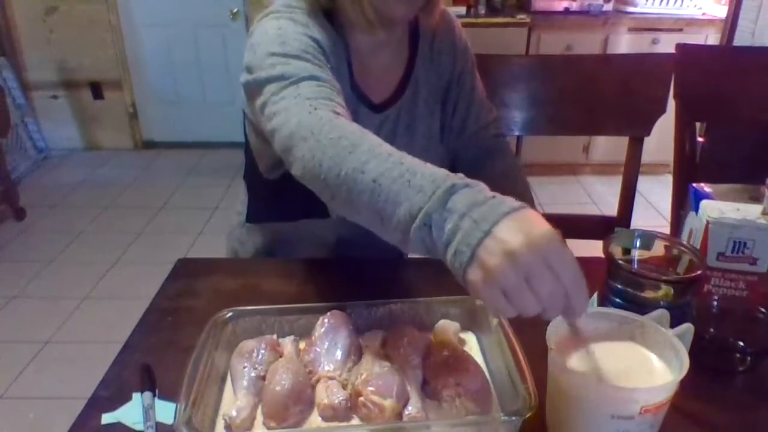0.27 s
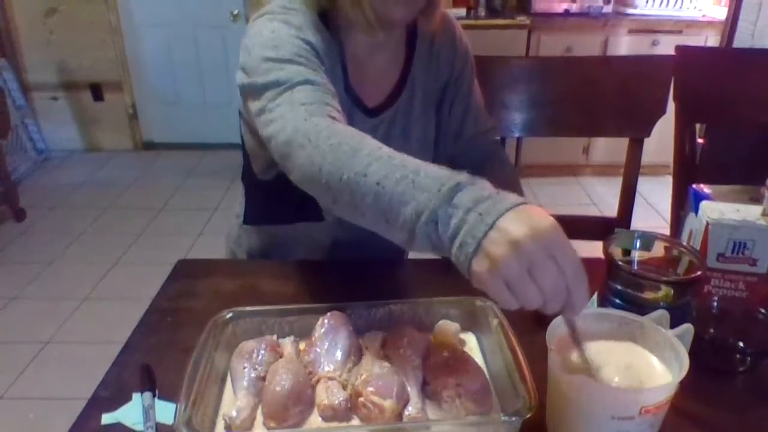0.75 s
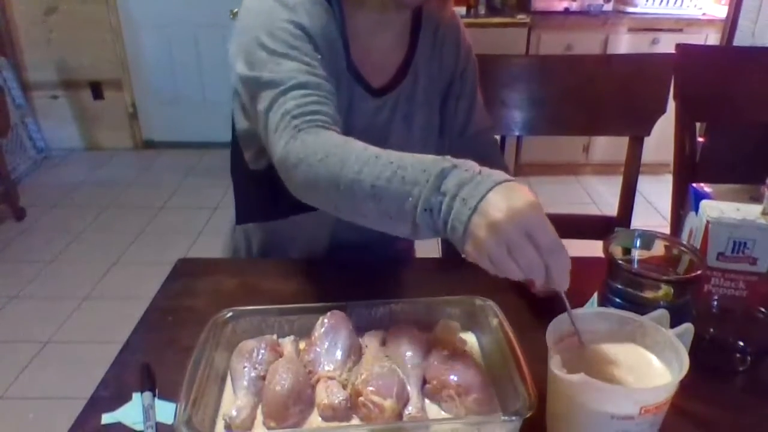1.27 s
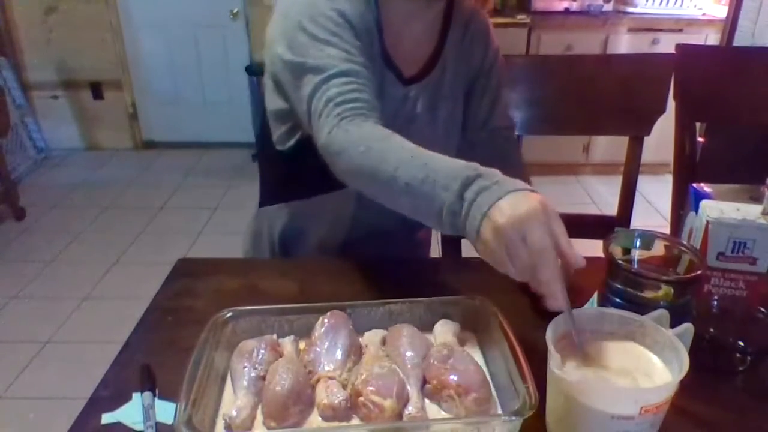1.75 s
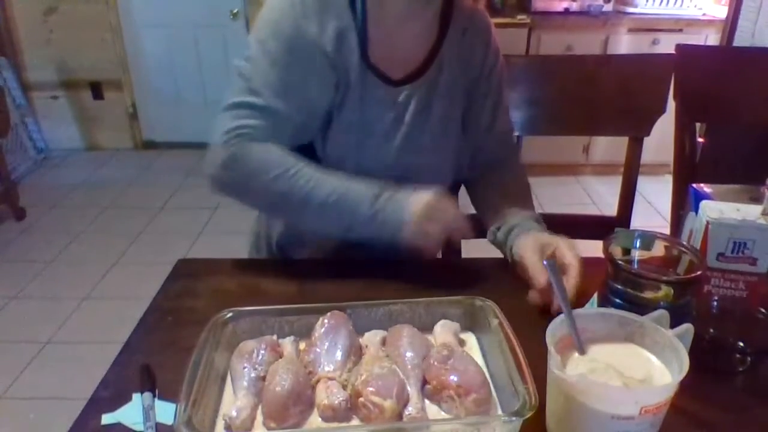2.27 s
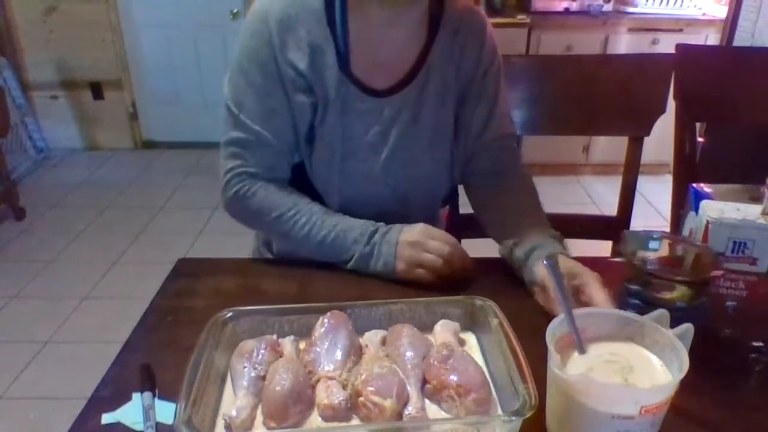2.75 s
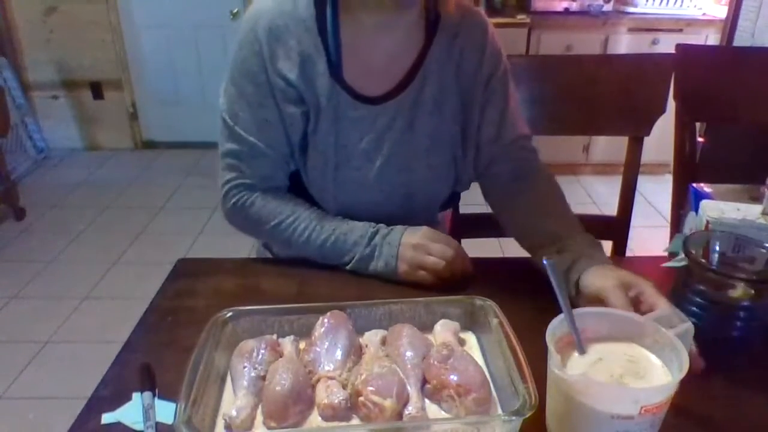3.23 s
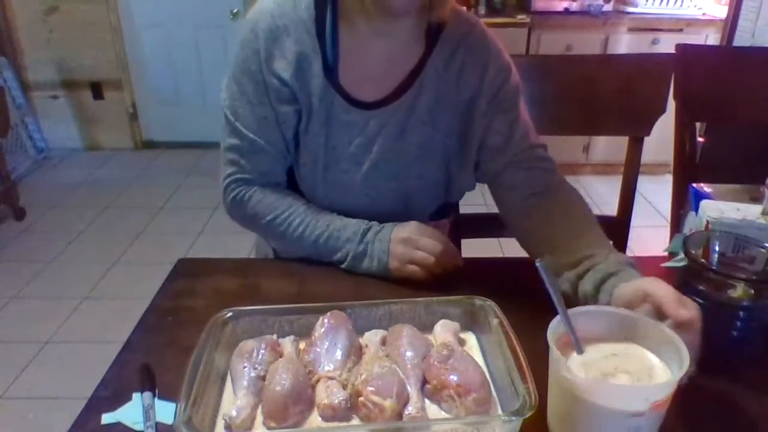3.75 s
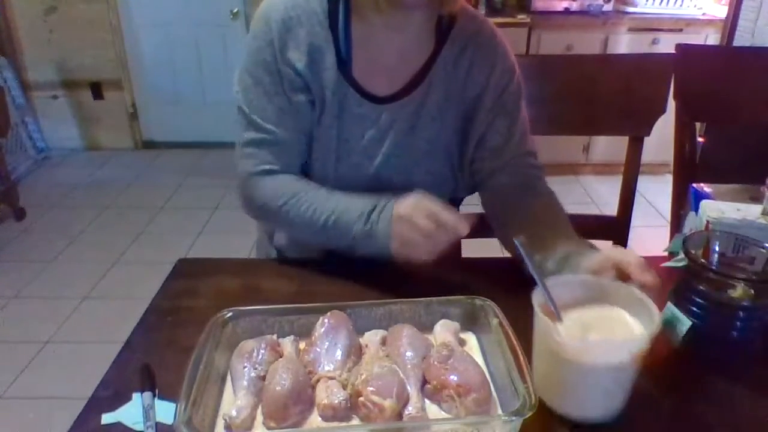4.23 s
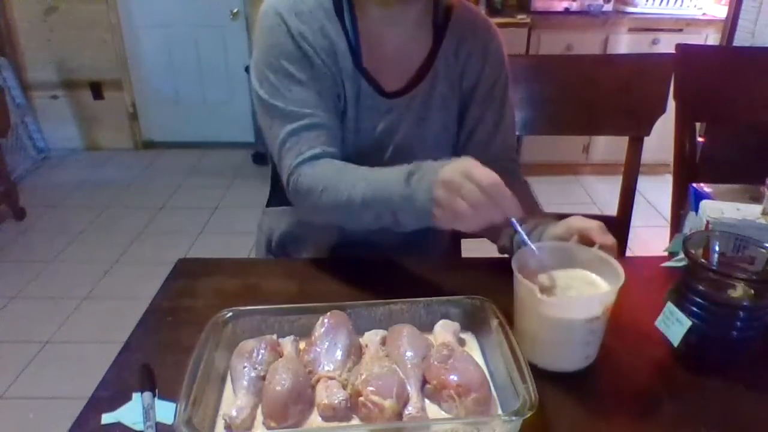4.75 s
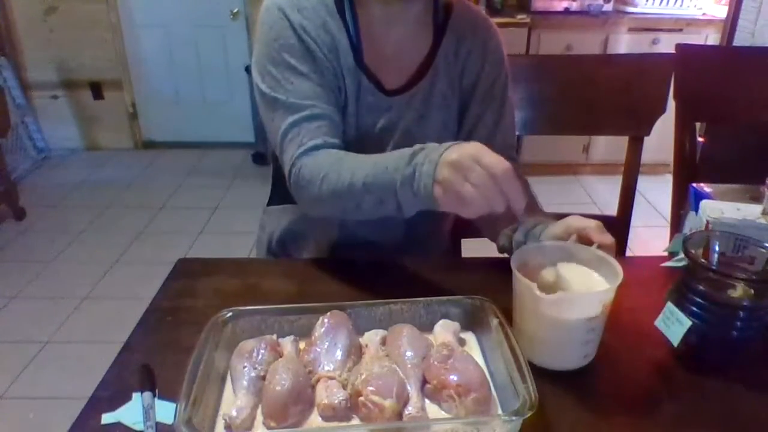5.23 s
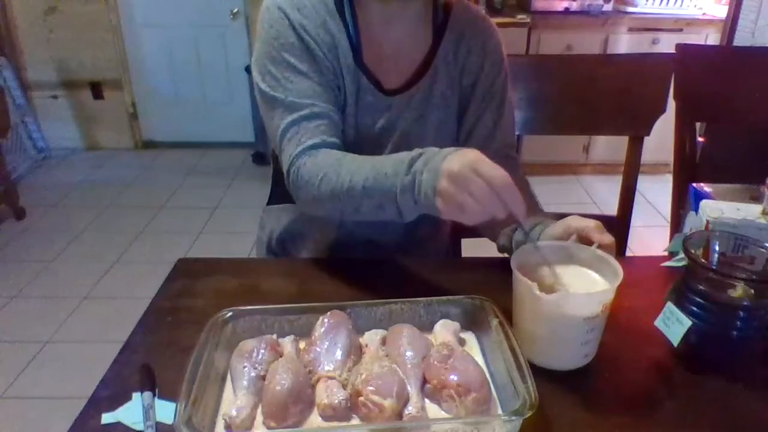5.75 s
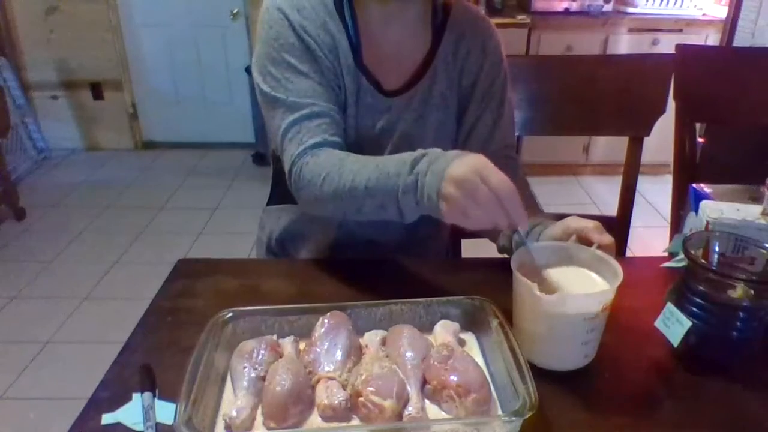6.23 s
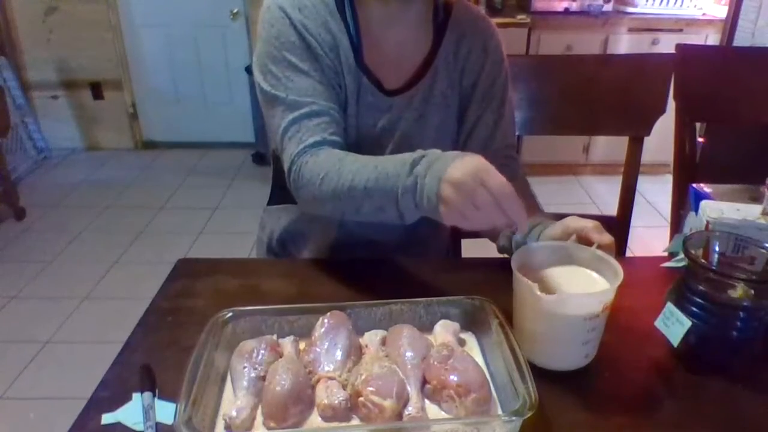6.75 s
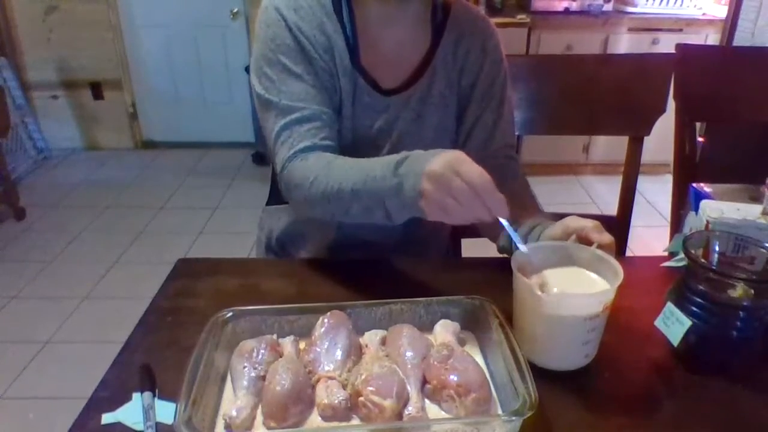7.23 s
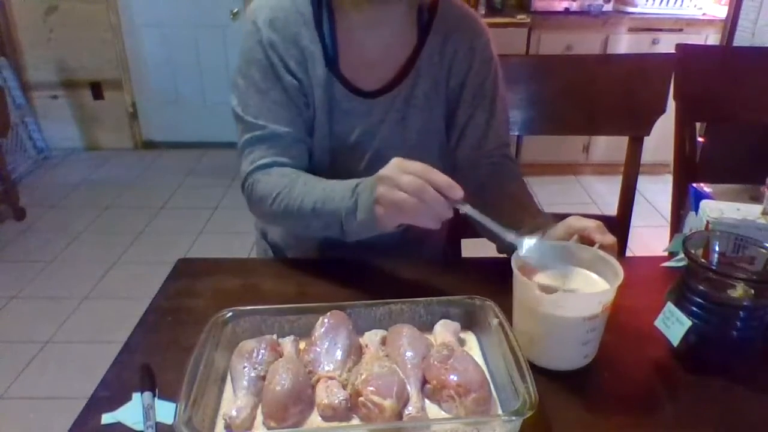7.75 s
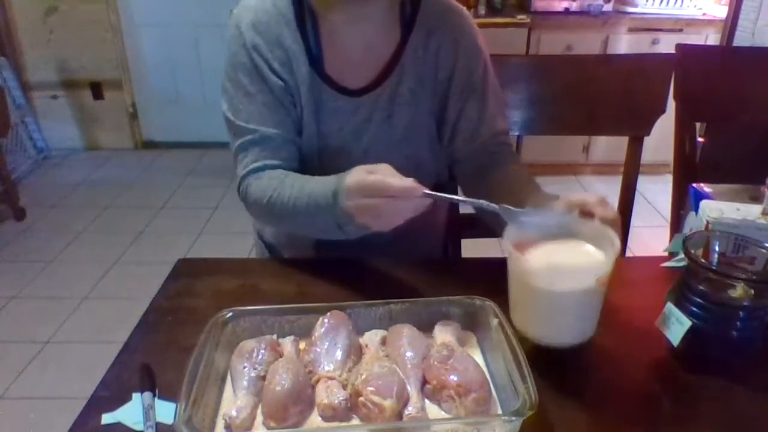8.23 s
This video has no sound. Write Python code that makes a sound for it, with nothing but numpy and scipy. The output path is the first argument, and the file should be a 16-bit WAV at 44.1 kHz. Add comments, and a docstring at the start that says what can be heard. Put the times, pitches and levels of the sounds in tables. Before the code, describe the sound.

A steel spoon knocks in a plastic jug of creamy marinade, pauses for bumps and sliding on a wooden table, then beats fast and gritty.

```python
"""First a few knocks of a steel spoon in a plastic jug of creamy marinade on a wooden kitchen table.
The spoon is left leaning, a glass jar is pushed aside and the jug drawn closer: dull bumps, gritty friction.
Then fast beating: forward strokes knock or skid along the wall, return strokes tap it.
Blows ring damped modes of table, jug and spoon; marinade, slides and sleeves are shaped random grains.
All is straight ahead of the microphone, over still kitchen air, a very faint noise and a thin pulsing whine."""
import sys
import numpy as np
from scipy import signal
from scipy.fft import rfft, irfft, next_fast_len
from scipy.io import wavfile
from scipy.ndimage import uniform_filter1d, map_coordinates

SR = 44100
rng = np.random.default_rng(int(sys.argv[2]) if len(sys.argv) > 2 else 0)


def wav_out(sig):
    """Save sig, one row per channel (or a flat mono array), as 16-bit PCM at SR to the path in sys.argv[1]."""
    wavfile.write(sys.argv[1], SR, np.round(np.clip(np.atleast_2d(sig).T, -1, 1) * 32767).astype(np.int16))


N = 374407  # samples

# Spoon skids along the jug wall; thump (base and table), wall and rim are relative to the clack:
# (t/s, strength/dB, thump/dB, wall/dB, rim/dB, brightness/dB per octave, slip decay/s)
SPOON_SKIDS = [(0.625, -67.5, -12, 3, -1.5, -1, 0.01), (1.344, -64.5, -5, -9, -1.5, -6, 0.039),
               (1.493, -74, 9, 14.5, 7.5, -14, 0.16), (1.696, -58.5, 6.5, -2.5, -6, -0.5, 0.01),
               (1.745, -76, 18, 13, 7, -7, 0.058), (4.688, -63.5, -5, 1.5, 1, -5, 0.014),
               (4.736, -66, -0.5, -18, 1.5, -2, 0.016), (5.368, -54, -21, -19, -9, 5, 0.015),
               (5.4697, -44, -0.5, -2, -1, 3.5, 0.0024), (5.512, -50.5, -9, -5.5, -2, 0.5, 0.081),
               (5.661, -44, -0.5, -1, -5, 0, 0.0056), (5.752, -59, -12.5, -9, 1.5, 2, .018),
               (6.369, -49, 3.5, 5, -1, 2, 0.007), (6.533, -44.5, -0.5, 1, -3, 1.5, 0.01),
               (6.7047, -46.5, 2.5, 1.5, -1.5, 1, 0.012), (6.783, -76, 12, 16, -2, -3, .008),
               (6.882, -50, -3, -3, -2, 2, 0.0089)]
# Light taps, mostly on the return stroke, and rebounds:
# (t/s, strength/dB, thump/dB, wall/dB, rim/dB, brightness/dB per octave)
SPOON_TAPS = [(0.1136, -60.5, 5, -2, 5.5, 2), (0.303, -67.5, -18, 5.5, -2, 0),
              (1.966, -76, -20, -21.5, -25, 14), (2.387, -64, -27, -13, -18, 11),
              (2.439, -69.5, -4.5, -25, -6, 8), (3.471, -75, -16, -28, -26, 12),
              (4.358, -65, -10, -6, -11, 4), (4.577, -56, -2.5, -13, 0.5, -8),
              (4.902, -44.5, -8, -6, -4, 0.5), (4.981, -60, 0, -15, 2, -0.5), (5.169, -56, -9.5, -8, 1, 6),
              (5.181, -62, 0.5, -7, -5, 5), (5.107, -55, -4, -12, -9, 7), (6.04, -56, -9, -14, -4, 0),
              (6.213, -57, -15, -7, 1, -4), (6.322, -67, -19, -14, -8, -4), (6.716, -53.5, -19, -6, -8, -4),
              (5.357, -54, -12.5, -5.5, 1, 3.5), (5.535, -79, 16, -26, 12, -4),
              (5.569, -57, -14, -29, 2, 1), (5.7346, -61, -18, -2, 2, -3), (5.833, -64, -19, -13, -1, 3),
              (5.943, -53, -1.5, -5.5, 3.5, 4), (6.1171, -52, 1, -14, 4, 2),
              (6.237, -61, -16, -12.0, -18, -15), (6.289, -48.5, -2.5, -10, 1.5, 1),
              (6.458, -49, -3, -10, -1.5, -1.5), (6.558, -57.5, 10.5, 4.5, 0, -11),
              (6.632, -50, -3, -13, 1.5, 0), (6.799, -52, -1, -7, 3, 4), (6.895, -55, 5.5, -9, -10, 5),
              (6.973, -51.5, -1, -10.5, -0.5, 1)]
# Nominal ringing modes of the table top, from there up to the jug's rim and the spoon: (f/Hz, level/dB, t60/s)
TABLE_MODES = [(92.6, -9.5, 0.4), (132.2, -1, 0.18), (173, -4.5, 0.08), (215, 1, 0.071), (281, 4, 0.055)]
# Modes of the jug's base: (f/Hz, level/dB, t60/s)
BASE_MODES = [(350, -4.5, 0.016), (386.3, -0.5, 0.07), (437.5, -6, 0.091), (495, 5.5, 0.05),
              (603, -6.5, 0.068), (773, -5.5, 0.036), (890, -1, 0.022)]
# Modes of the jug's wall: (f/Hz, level/dB, t60/s)
WALL_MODES = [(1123, -24, 0.0067), (1348, -0.5, 0.059), (1403, 2, 0.029), (1470, 7.5, 0.035),
              (1564, -13, 0.075), (1954, -13.5, 0.062), (2115, -10.5, 0.099)]
# Modes of the jug's rim: (f/Hz, level/dB, t60/s)
RIM_MODES = [(2600, -19, 0.12), (2636, 0.5, 0.031), (2816, 8.5, .017), (2910, 2, 0.016), (3068, 4, 0.019),
             (3210, -6.5, 0.046), (3550, -1, 0.014)]
# Modes of the steel spoon: (f/Hz, level/dB, t60/s)
STEEL_MODES = [(4490, -2.5, 0.009), (5300, 1.5, 0.006), (5600, -4, 0.008), (6220, -6, 0.007),
               (13300, -5.5, .008), (14470, -4.5, 0.008)]


def amp(db):
    """Decibels to gain."""
    return 10 ** (np.asarray(db) / 20)


def unit(x):
    """Scale to rms 1."""
    return x / np.sqrt(np.mean(x ** 2) + 1e-20)


def along(points, hz):
    """Read (Hz, value) points on a log axis."""
    f, v = np.transpose(points)
    return np.interp(np.log(hz + 1), np.log(f + 1), v)


def filtered(x, response):
    """x times a response of frequency."""
    size = next_fast_len(N + SR // 2)
    return irfft(rfft(x, size) * response(np.fft.rfftfreq(size, 1 / SR)), size)[..., :N]


def coloured(x, spectrum):
    """x shaped by a (Hz, dB) curve, at rms 1."""
    return unit(filtered(x, lambda hz: amp(along(spectrum, hz))))


def grains(count, rate, spread_db):
    """Random tiny impacts of uneven size, about rate a second, at rms 1."""
    sizes = rng.standard_normal(count) * amp(spread_db * np.clip(rng.standard_normal(count), -2, 2))
    return unit(sizes * (rng.random(count) < rate / SR))


def add(track, s, sound):
    """Mix a sound into the track at time s."""
    start = max(round(s * SR), 0)
    track[start:start + len(sound)] += sound[:max(N - start, 0)]


def in_kitchen(x, wet_db, wall_s=0.0092, wall_db=-13, build_s=0.0027):
    """A sound, one near reflection and the diffuse tail of the room, whose decay varies with frequency."""
    # Decay of the kitchen: (f/Hz, t60/s)
    decay = [(100, 1), (300, 0.15), (490, 0.33), (750, 0.47), (1500, 0.26), (5000, 0.43), (13000, 0.28)]
    # Strength of the kitchen's tail, before the wet level: (f/Hz, level/dB)
    echo = [(50, -4.5), (130, -6), (380, -7), (490, 2), (620, -12), (850, -4), (1400, -8.5), (3000, -7.5),
            (6000, -12), (9000, -10), (14000, -11)]
    reflections = grains(SR // 2, rate=3500, spread_db=3)
    hz, t, z = signal.stft(reflections, SR, nperseg=256)
    t60 = along(decay, hz)[:, None]
    level = amp(along(echo, hz)[:, None] - 60 * t / t60)
    # equal energy whatever the decay time
    gain = level * np.sqrt(2 * np.log(1000) / (t60 * SR))
    tail = signal.istft(z * gain, SR, nperseg=256)[1]
    build_up = 1 - np.exp(-np.arange(len(tail)) / SR / build_s)
    room = amp(wet_db) * tail * build_up
    room[0] += 1  # direct sound
    room[round(wall_s * SR)] += amp(wall_db)
    return signal.fftconvolve(x, room)


def ring(modes, t, scatter_db=0.0, detune=0.0049, lag=0.99):
    """Damped modes; strength, tuning and phase shift with the point of contact and the liquid's height."""
    hz, db, t60 = np.transpose(modes)[:, :, None]
    strength, shift, phase = rng.standard_normal((3, len(modes), 1))
    onset = 1 - np.exp(-2 * np.pi * hz * t)
    waves = np.sin(2 * np.pi * hz * (1 + detune * shift) * t + lag * phase) * onset
    return np.sum(amp(db + scatter_db * strength - 60 * t / t60) * waves, axis=0)


def swells(rows):
    """Gain per sample of hand movements (s, dB, rise s, fall s); rise and fall are the times for 20 dB."""
    shape = 2.04  # 1 = pointed, 2 = rounded
    power = np.zeros(N)
    for s, db, rise_s, fall_s in rows:
        first = max(int((s - 2 * rise_s) * SR), 0)
        last = min(int((s + 2 * fall_s) * SR), N)
        t = np.arange(first, last) / SR - s
        drop_db = 20 * np.maximum(-t / rise_s, t / fall_s) ** shape
        power[first:last] += amp(db - drop_db) ** 2
    return np.sqrt(power)


def flutter(rate, depth_db):
    """Gain per sample of a rubbing contact whose pressure changes at random, rate times a second."""
    knots = rng.standard_normal(int(N * rate / SR) + 4)
    return amp(depth_db * map_coordinates(knots, [np.arange(N) * rate / SR], order=1))


def patchy(x, depth_db):
    """Friction changes colour as the touching surfaces shift: slow random patches of gain, at rms 1."""
    z = signal.stft(x, nperseg=512)[2]
    across_hz = uniform_filter1d(rng.standard_normal(z.shape), size=7, axis=0)
    field = uniform_filter1d(across_hz, size=12, axis=1)
    return unit(signal.istft(z * amp(depth_db * unit(field)), nperseg=512)[1][:N])


def evened(x, colour_db, smooth_hz=450):
    """Flatten a burst's broad spectrum and colour it (dB as a function of Hz), keeping its sharp start."""
    size = 2 * len(x)
    width = max(int(smooth_hz * size / SR), 1)
    power = np.abs(uniform_filter1d(np.abs(rfft(x, size)) ** 2, size=width))
    wanted = amp(colour_db(np.fft.rfftfreq(size, 1 / SR)))
    # folding the cepstrum makes the filter minimum-phase, so nothing precedes the blow
    cepstrum = irfft(np.log(wanted / np.sqrt(power + 1e-12)))
    cepstrum[1:len(x)] *= 2
    cepstrum[len(x):] = 0
    return irfft(rfft(x, size) * np.exp(rfft(cepstrum)))[:len(x)]


def background(floor_db=-63, side_db=-76, whine_db=-2, pulse_hz=15.06):
    """Still kitchen air, a very faint noise, opposite in the two channels, and a thin pulsing electronic whine."""
    # Colour of the still air: (f/Hz, level/dB)
    quiet = [(20, -3), (55, 4.5), (90, -1), (130, -8), (220, -14), (500, -16.5), (850, -20.5), (1500, -20),
             (3000, -24.5), (5000, -25), (7500, -24.5), (13000, -19.5), (15500, -21.5), (17000, -39.5)]
    # Colour of the faint noise between the channels: (f/Hz, level/dB)
    side_colour = [(100, -16.5), (3000, -22), (8000, -56), (14000, 10.5), (17000, -5.5)]
    # Faint electronic tones, before whine_db and the pulsing: (f/Hz, level/dB)
    tones = [(2900, -81.5), (8000, -74.5), (10901, -75.5), (11590, -91.5)]
    t = np.arange(N) / SR
    air = amp(floor_db) * coloured(rng.standard_normal(N), quiet)
    steady = sum(amp(db + whine_db) * np.sin(2 * np.pi * hz * t) for hz, db in tones)
    whine = steady * (1 + np.sin(2 * np.pi * pulse_hz * t))
    side = amp(side_db) * coloured(rng.standard_normal(N), side_colour)
    return air + whine + np.array([side, -side])


def arms(cloth_db=-1, sway_db=-3):
    """Knitted sleeves brush along as fine grains, and the table rumbles under the moving arms."""
    # Brushes of a sleeve, before cloth_db: (t/s, level/dB, rise/s, fall/s)
    brushes = [(0.52, -58, 0.043, 0.071), (1.02, -55.5, 0.17, 0.13), (1.13, -56, 0.036, 0.095),
               (1.35, -50, 0.028, 0.094), (1.6, -71, 0.23, 0.4), (2.05, -57.5, 0.12, 0.21),
               (2.26, -54.5, 0.075, 1), (2.47, -51.5, 0.071, 0.12), (2.55, -51.5, 0.071, 0.036),
               (2.82, -52.5, 0.08, 0.32), (3.2, -66, 0.13, 0.94), (3.52, -59.5, 0.087, 0.16),
               (3.715, -50, 0.054, 0.066), (4.2, -53, 0.098, 0.19), (4.44, -55, 0.2, 0.074)]
    # Leaning on the table, before sway_db: (t/s, level/dB, rise/s, fall/s)
    leans = [(0.2, -46.5, 0.35, 0.25), (0.86, -52, 0.15, 0.21), (1.82, -43.5, 0.64, 0.27),
             (2.62, -53.5, 0.36, 0.15), (4.03, -49.5, 0.11, 0.17), (4.88, -43, 0.037, 0.16),
             (6.7, -47.5, 1.76, 0.38)]
    # Colour of the sleeve: (f/Hz, level/dB)
    cloth_colour = [(300, -60), (1500, -17), (4000, -13), (7000, -10), (10000, -6), (13000, 0), (15000, -2),
                    (16500, -14), (18000, -80)]
    # Colour of the table under the arms: (f/Hz, level/dB)
    rumble = [(20, -2.5), (45, 7.5), (90, -2.5), (130, -24.5), (210, -4), (300, -12), (600, -16),
              (1500, -52.5)]
    fibres = coloured(grains(N, rate=30000, spread_db=0.5), cloth_colour)
    cloth = amp(cloth_db) * swells(brushes) * patchy(fibres, depth_db=3.0)
    sway = amp(sway_db) * swells(leans) * coloured(rng.standard_normal(N), rumble)
    catching = flutter(rate=60, depth_db=2)
    return cloth * catching + sway


def slide(start, hardest, end, db, easing_db):
    """Gain of a pushed object (times in s): loudest at the hardest push, easing_db a second less either side."""
    grip_s, stop_s = 0.1, 0.19  # a further 20 dB per this time before the start and after the end
    t = np.arange(N) / SR
    at_rest = np.maximum(start - t, 0) / grip_s + np.maximum(t - end, 0) / stop_s
    return amp(db - easing_db * np.abs(t - hardest) - 20 * at_rest)


def sliding():
    """The bases of jar and jug catch on the table's grain in many tiny slips; the full jug also groans."""
    # Colour of the jar on the table: (f/Hz, level/dB)
    glass_on_wood = [(60, -37), (130, -15), (240, -5), (330, -1.5), (520, -4.5), (800, -9.5), (1300, -12),
                     (2500, -20.5), (5600, -32.5), (6800, -23), (7700, -39), (12800, -24), (15000, -27),
                     (17000, -56)]
    # Colour of the jug on the table: (f/Hz, level/dB)
    plastic_on_wood = [(100, -10), (400, 9.5), (900, 3), (1500, 0.5), (3000, -2), (6000, -6.5), (9500, -18),
                       (13000, -5), (17000, -62)]
    # Colour of the full jug's groan: (f/Hz, level/dB)
    groan_colour = [(70, -19.5), (140, -16), (210, 5.5), (290, -4.5), (380, 0.5), (520, -17), (1200, -29)]
    jar_push = slide(start=2.645, hardest=2.87, end=3.115, db=-41.0, easing_db=31.0)
    jug_pull = slide(start=3.7, hardest=4.34, end=4.475, db=-55.0, easing_db=13.5)
    jug_strain = slide(start=3.7, hardest=4.1, end=4.5, db=-50.5, easing_db=36.0)
    jar_slips = coloured(grains(N, rate=9000, spread_db=-0.5), glass_on_wood)
    jug_slips = coloured(grains(N, rate=5600, spread_db=-1.5), plastic_on_wood)
    jar = jar_push * patchy(jar_slips, depth_db=2.1)
    jug = jug_pull * patchy(jug_slips, depth_db=1.0)
    groan = jug_strain * coloured(grains(N, rate=1500, spread_db=1.5), groan_colour)
    judder = flutter(rate=150, depth_db=1.2)
    return (jar + jug + groan) * judder


def bumps(gain_db=-4, life_s=0.064, table_db=-16, base_db=-17, judder_s=0.025, wet_db=-2):
    """A soft push gives a few dull cycles; the jug judders on its base and the table top rings."""
    # Soft bumps against the table, before gain_db and base_db:
    # (t/s, push level/dB, pitch f/Hz, jug base relative level/dB)
    table_bumps = [(1.33, -33, 54, -18), (1.347, -29, 40, -29), (1.358, -37, 188, -22),
                   (1.771, -23.5, 207, -16), (1.808, -19.5, 173, -12), (1.86, -25.5, 173, -29),
                   (2.514, -40, 51, -26), (2.591, -32.5, 297, -26), (2.723, -41, 694, -13),
                   (2.871, -32.5, 365, -2), (2.897, -34.5, 326, -1.5), (2.947, -32.5, 330, -7),
                   (3.998, -20.5, 253, -17)]
    out, t = np.zeros(N), np.arange(SR // 3) / SR
    for s, db, hz, jug_db in table_bumps:
        push = np.sin(2 * np.pi * hz * t) * amp(-60 * t / life_s) * (1 - np.exp(-t / 0.003))
        judder = grains(len(t), rate=1500, spread_db=8.0) * np.exp(-t / judder_s)
        jug = unit(signal.fftconvolve(ring(BASE_MODES[:3], t), judder)[:len(t)])
        table = ring(TABLE_MODES, t)
        thud = amp(gain_db) * push + amp(table_db) * table + amp(jug_db + base_db) * jug
        add(out, s, in_kitchen(amp(db) * thud, wet_db))
    return out


def marinade(gain_db=-1, bubble_hz=3300, cycles=4, bubble_db=-9, rattle_db=-4):
    """The spoon drags through thick liquid: a wet swish, fine bursting bubbles and a rattle along the wall."""
    # Slow drags of the spoon through the marinade, before gain_db: (t/s, level/dB, rise/s, fall/s)
    drags = [(0.15, -60, 0.27, 0.47), (0.6, -63, 0.14, 0.18), (0.97, -66.5, 0.16, 0.76),
             (1.6, -61.5, 0.42, 0.67), (4.66, -58.5, 0.37, 0.092), (4.93, -56, 0.034, 0.036),
             (5.56, -51, 0.1, 0.026)]
    # Colour of the wet swish: (f/Hz, level/dB)
    cream = [(80, -36), (150, -15), (220, 14), (320, -6), (490, 9), (750, -9), (1100, 0.5), (1480, 3),
             (1850, -8.5), (2800, -13.5), (3700, -8.5), (5200, -7.5), (8500, -14), (13200, -8.5),
             (17000, -60)]
    wave_db, wave_grows, wave_rise_s, wave_fall_s = -24.5, 0.63, 0.012, 0.12
    bubble_rate = 1200  # a second
    froth, t = np.zeros(N), np.arange(SR // 100) / SR
    for when, pitch, size in rng.random((int(bubble_rate * N / SR), 3)):
        turns = bubble_hz * 2 ** (2 * pitch - 1) * t  # within an octave of bubble_hz
        pop = np.sin(2 * np.pi * turns * (1 + 6 * t)) * np.exp(-turns / cycles)  # pitch rises
        add(froth, when * N / SR, amp(-20 * size) * pop)
    swish = coloured(grains(N, rate=2600, spread_db=3.5), cream)
    catches = grains(N, rate=220, spread_db=4)
    jug_and_spoon = ring(WALL_MODES + RIM_MODES + STEEL_MODES, np.arange(SR // 10) / SR)
    rattle = signal.fftconvolve(catches, jug_and_spoon)[:N]
    drag = swish + amp(bubble_db) * unit(froth) + amp(rattle_db) * unit(rattle)
    # every skid and tap throws a wave; stronger ones throw larger waves
    waves = [(s + wave_rise_s, wave_db + wave_grows * db, wave_rise_s, wave_fall_s)
             for s, db, *_ in SPOON_SKIDS + SPOON_TAPS]
    return amp(gain_db) * swells(drags + waves) * drag


def scraping(low_hz=1700, high_hz=6200, cycles=5, spread_db=7, wet_db=-4):
    """The spoon's edge grates over spice grains on the wall: clumps of tiny ticks, each with its own pitch."""
    # The spoon's edge scrapes on along the wall: (t/s, level/dB, rise/s, fall/s)
    scrapes = [(0.648, -58, 0.014, 0.025), (1.53, -61, 0.054, 0.067), (1.72, -63, 0.024, 0.066),
               (4.745, -59, 0.02, 0.04), (5.385, -47, 0.02, 0.025), (5.517, -45, 0.049, 0.027),
               (5.54, -50, 0.015, 0.06), (5.685, -46.5, 0.032, 0.05), (5.752, -53, 0.025, 0.023),
               (5.875, -41, 0.019, 0.037), (6.06, -46, 0.014, 0.027), (6.385, -39, 0.015, 0.015),
               (6.553, -43, 0.025, 0.038), (6.725, -44, 0.035, 0.039), (6.9, -45, 0.023, 0.027)]
    grit, t = np.zeros(N), np.arange(SR // 100) / SR
    tick_rate = 750  # a second
    count = int(tick_rate * N / SR)
    places = rng.random((count, 2))
    sizes = np.clip(rng.standard_normal(count), -2, 2)
    for (when, pitch), size in zip(places, sizes):
        turns = low_hz * (high_hz / low_hz) ** pitch * t
        tick = np.sin(2 * np.pi * turns) * np.exp(-turns / cycles)
        add(grit, when * N / SR, amp(spread_db * size) * tick)
    rough = flutter(rate=170, depth_db=5)
    return in_kitchen(swells(scrapes) * unit(grit * rough), wet_db)[:N]


def contact(strength_db, thump_db, wall_db, rim_db, bright_db, chatter_s, catch_rate, chatter_db,
            soften_db, steel_db, table_db, body_db, wet_db, wall_tuning):
    """A sharp blow, then catch-and-slip chatter: both clack and ring spoon, wall, rim; base and table thump."""
    # Colour of steel on plastic, before the scatter and brightness: (f/Hz, level/dB)
    clack_colour = [(200, -36.5), (900, -10), (1900, -11), (2250, -9), (3000, -3), (3700, 1), (4600, 1.5),
                    (5700, 2.5), (7000, -3), (9000, -7.5), (11000, -7), (14200, -2.5), (15500, -10.5),
                    (17000, -14.5)]
    hollow_hz = 123  # the table top radiates little below this
    t = np.arange(SR // 3) / SR
    slip = grains(len(t), rate=catch_rate, spread_db=4.5) * np.exp(-t / chatter_s)
    force = amp(chatter_db) * slip / (np.linalg.norm(slip) + 1e-12)
    force[0] += 1  # the blow
    force = evened(force, np.zeros_like)

    # every point of contact colours the clack a little differently
    colour = [(hz, db + rng.normal(0, 2.9)) for hz, db in clack_colour]

    def clack_db(hz):
        """Contact colour, tilted above 4 kHz by the brightness."""
        return along(colour, hz) + bright_db * np.log2(np.maximum(hz, 4000) / 4000)

    softening = amp(-soften_db * (1 - np.exp(-t / 0.0033)))  # a negative soften_db swells instead
    clack = unit(evened(force, clack_db) * softening)

    # the spoon wanders between three spots, each of which rings a little differently
    spot = np.repeat(rng.integers(3, size=len(t)), SR // 250)[:len(t)]

    def driven(modes, time, **scatter):
        """Modes rung by the contact force, drawn anew for each spot, at rms 1."""
        return unit(sum(signal.fftconvolve(ring(modes, time, **scatter), force * (spot == k))[:len(t)]
                        for k in range(3)))

    brief = t[:SR // 10]
    steel = amp(steel_db) * driven(STEEL_MODES, brief, scatter_db=3.0, detune=0.022)
    # wall_tuning scales the wall's pitch and speed of decay together
    wall = amp(wall_db) * driven(WALL_MODES, wall_tuning * brief, scatter_db=1.0, detune=0.02)
    rim = amp(rim_db) * driven(RIM_MODES, brief, scatter_db=3, detune=0.035)
    base = unit(ring(BASE_MODES, t, scatter_db=2, detune=0.009, lag=0.8))
    table = unit(ring(TABLE_MODES, t, scatter_db=3.0, detune=0.015))
    high_pass = signal.butter(2, hollow_hz, "highpass", fs=SR, output="sos")
    thump = amp(thump_db) * unit(signal.sosfilt(high_pass, base + amp(table_db) * table))
    body = amp(body_db) * (thump + wall + rim)
    return in_kitchen(amp(strength_db) * (clack + steel + body), wet_db)


def spoon():
    """Square knocks drive the jug's base, gritty skids its wall and light return taps its rim."""
    # Square knocks; thump, wall and rim are relative to the clack, the table top to the jug base:
    # (t/s, strength/dB, thump/dB, wall/dB, rim/dB, brightness/dB per octave, table top/dB, room boom/dB)
    knocks = [(0.0191, -41, 4, -4, -7.5, -1, -2, 7.5), (0.1903, -41.5, 4.5, -2, -11.5, -1.5, -3, 12),
              (0.7628, -51, 1.5, -3.5, -12.5, -4, 2, 11.5), (4.002, -58.5, -11, -15, -5.5, 2.5, 9, -14),
              (4.858, -44, -0.5, -13.5, -11.5, 3, 3, -5), (5.0935, -46, -4.5, -13.5, -12, 3.5, -0.5, -6),
              (5.307, -51, -5.5, -9, -19, -4, -7, 3), (5.8455, -42.5, 3, -5.5, -8, -1.5, -6, 3),
              (6.031, -41, -0.5, -4, -11, -0.5, -2.5, -2), (6.2013, -45, 5, -6, -4.5, 0, -0.5, 8),
              (7.057, -53.5, 4.5, 0, -1.5, 2, 0.5, 11)]
    # Close room modes that beat after a knock: (f/Hz, level/dB, t60/s)
    boom_modes = [(487, -7.5, 0.4), (501.7, 0, 0.4), (516.4, -8.5, 0.4)]
    out, t = np.zeros(N), np.arange(SR // 2) / SR
    for s, db, *touch, table_db, boom_db in knocks:
        knock = contact(db, *touch, chatter_s=0.0016, catch_rate=7000, chatter_db=3.0, soften_db=-3.0,
                        steel_db=-3, table_db=table_db, body_db=2, wet_db=2, wall_tuning=0.97)
        add(out, s, knock)
        add(out, s, amp(db + boom_db) * ring(boom_modes, t, detune=0.0005, lag=0.16))
    for s, *touch in SPOON_SKIDS:  # the last column sets chatter_s
        skid = contact(*touch, catch_rate=1000, chatter_db=10.0, soften_db=4.0, steel_db=-26,
                       table_db=5.5, body_db=-1.5, wet_db=3.5, wall_tuning=1.005)
        add(out, s, skid)
    for s, *touch in SPOON_TAPS:
        tap = contact(*touch, chatter_s=0.0027, catch_rate=6700, chatter_db=12, soften_db=1.0,
                      steel_db=-15, table_db=4.0, body_db=0, wet_db=-1, wall_tuning=1.005)
        add(out, s, tap)
    return out


def scene():
    """Everything happens straight ahead of the microphone; only a faint noise differs between the sides."""
    return background() + arms() + sliding() + bumps() + marinade() + scraping() + spoon()


def record(dry):
    """The microphone's chain cuts off very steeply above its band limit."""
    top_hz = 15750
    return filtered(dry, lambda hz: 1 / np.sqrt(1 + (hz / top_hz) ** 140))


dry = scene()
out = record(dry)
wav_out(out)
```